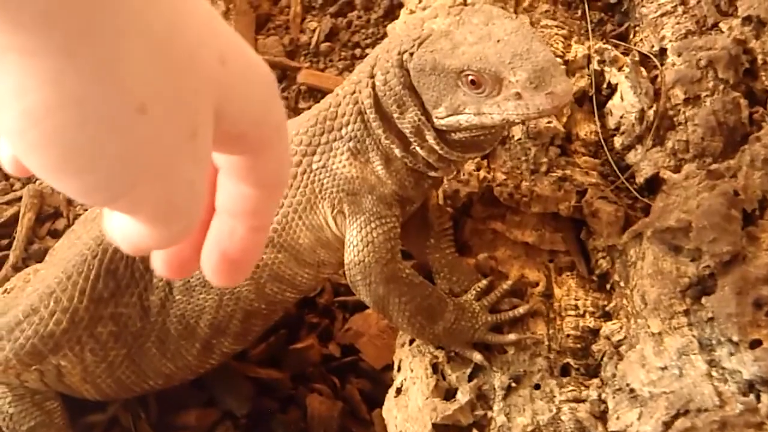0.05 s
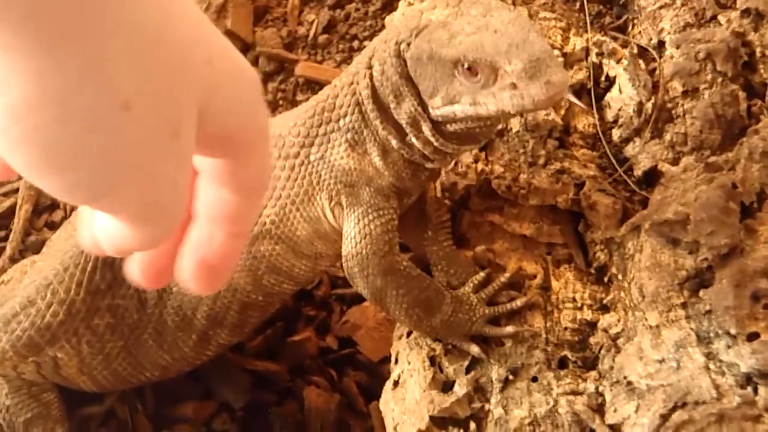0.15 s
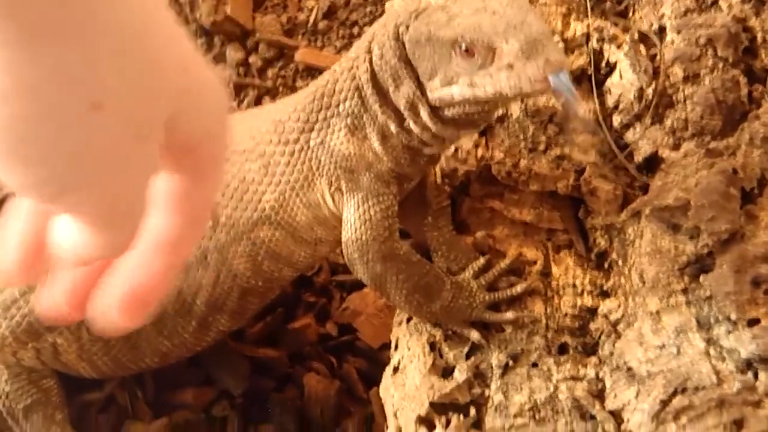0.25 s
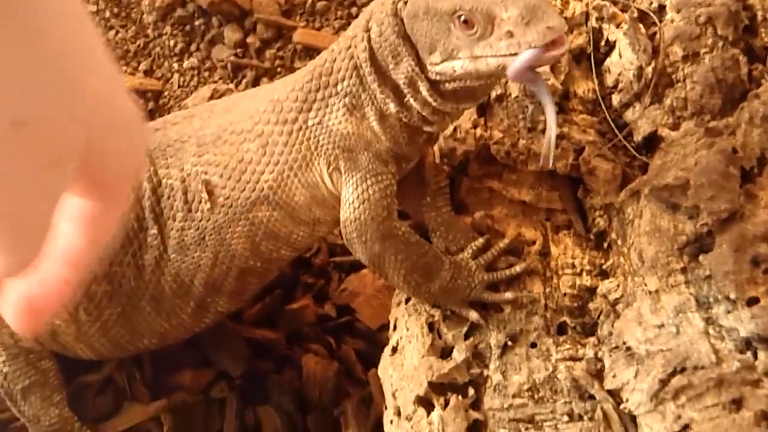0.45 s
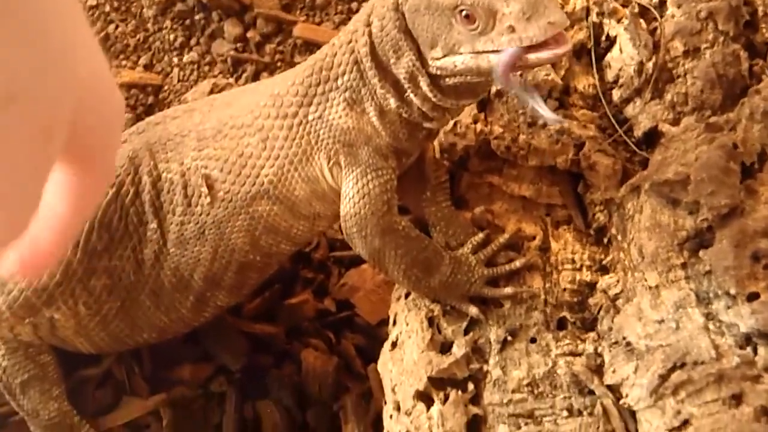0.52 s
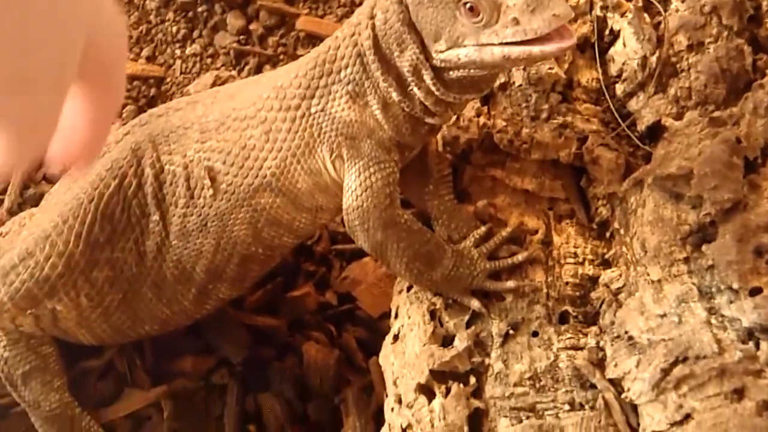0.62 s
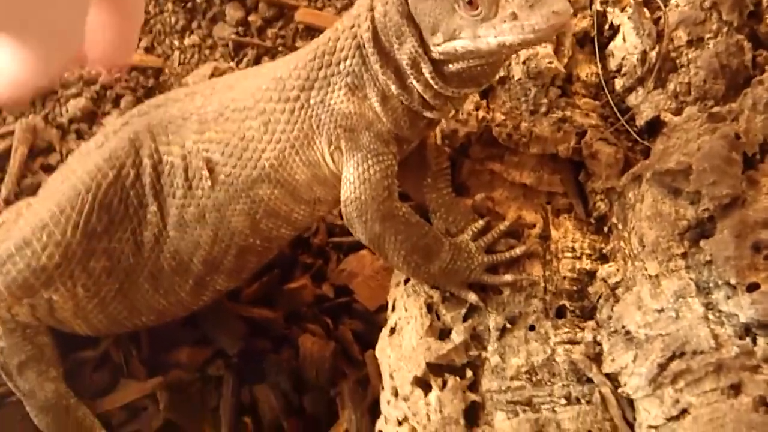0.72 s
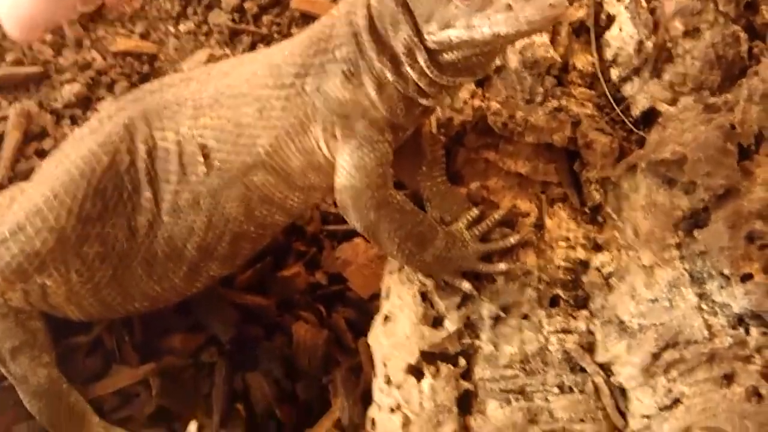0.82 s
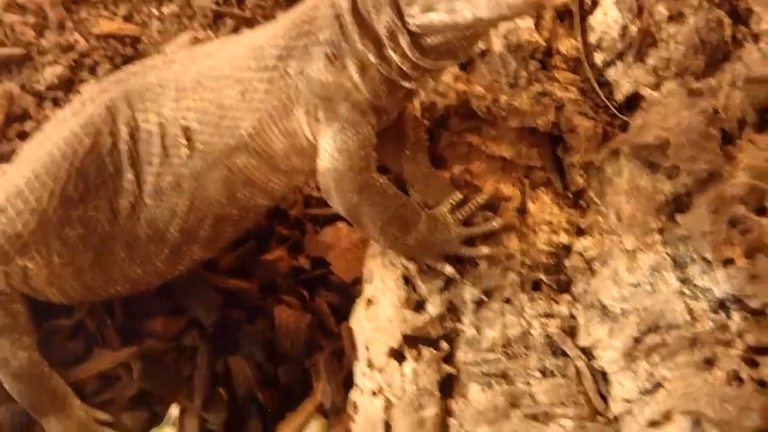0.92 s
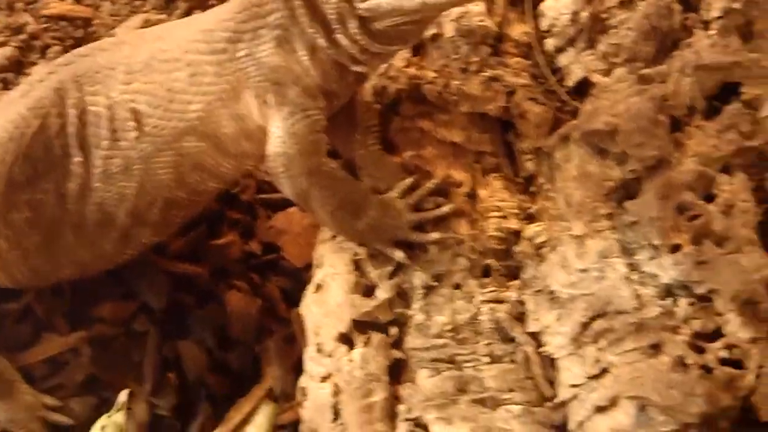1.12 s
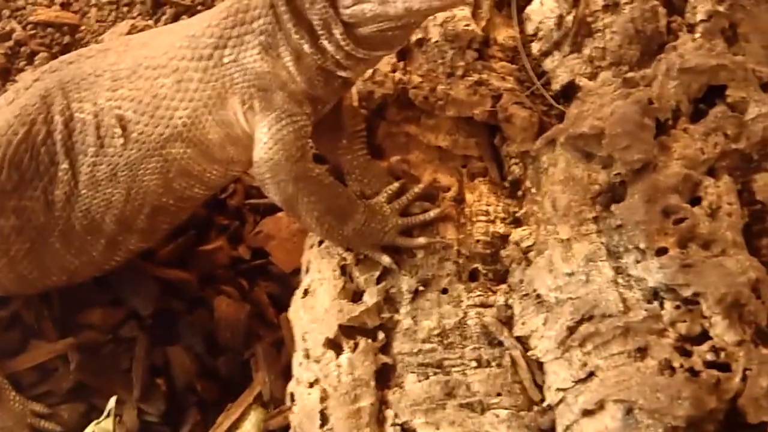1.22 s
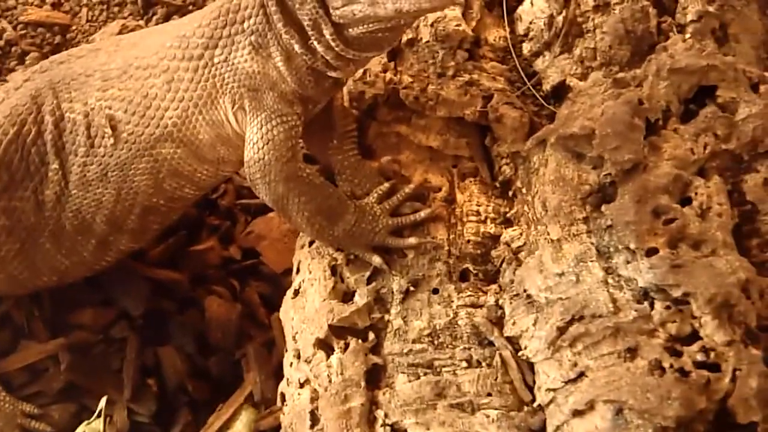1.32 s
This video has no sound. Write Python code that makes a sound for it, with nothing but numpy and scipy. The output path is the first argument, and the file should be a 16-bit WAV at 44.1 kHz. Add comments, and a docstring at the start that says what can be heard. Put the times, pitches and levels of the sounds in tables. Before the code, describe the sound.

A cricket chirps twice indoors, with soft low bumps and faint room hiss.

```python
"""A cricket chirps twice across a hard-walled room, two wing strokes to a chirp, and the room rings on.
In each stroke a scraper runs along the wing's file, making a high tone that falls as the wing slows.
Close by, a hand-held camera takes soft bumps and rubs, and dry ticks sound from the bark and litter
of a terrarium. Behind it all are a steady room hiss and a faint wash of more distant crickets."""
import sys
import numpy as np
from scipy import signal
from scipy.fft import rfft, irfft
from scipy.io import wavfile

SR = 44100
rng = np.random.default_rng(int(sys.argv[2]) if len(sys.argv) > 2 else 0)


def pcm_store(signal):
    """Save signal as 16-bit PCM."""
    levels = np.round(np.clip(np.atleast_2d(signal), -1, 1) * 32767)
    wavfile.write(sys.argv[1], SR, levels.astype(np.int16).T)


N = 59535


def amp(db):
    """Decibels to gain."""
    return 10 ** (np.asarray(db) / 20)


def unit_rms(x):
    """Scales to rms 1."""
    return x / np.sqrt(np.mean(x ** 2) + 1e-20)


def add(mix, start_s, sound):
    """Mixes a sound in at start_s."""
    part = mix[max(round(start_s * SR), 0):][:len(sound)]
    part += sound[:len(part)]


def coloured(x, spectrum):
    """Filters by (f/Hz, level/dB) points, interpolated over log frequency."""
    hz, db = np.transpose(spectrum)
    bin_hz = np.fft.rfftfreq(N, 1 / SR)
    gain = amp(np.interp(np.log(bin_hz + 1), np.log(hz), db))
    return irfft(rfft(x) * gain, N)


def band_noise(centre_hz, width_hz):
    """Noise in a bell-shaped band, rms 1."""
    bell = np.exp(-2 * ((np.fft.rfftfreq(N, 1 / SR) - centre_hz) / width_hz) ** 2)
    return unit_rms(irfft(rfft(rng.standard_normal(N)) * bell, N))


def room(x, t60_s, build_s):
    """Dense reflections of random sign that build up and die away, at the rms of x."""
    t = np.arange(SR) / SR
    taps = rng.choice([-1., 1.], SR) * (rng.random(SR) < 0.1)
    taps *= (1 - np.exp(-(t / build_s) ** 2)) * amp(-60 * t / t60_s)
    return unit_rms(signal.fftconvolve(x, taps)[:N]) * np.sqrt(np.mean(x ** 2))


# Room noise spectrum: f/Hz, level/dB
HISS_SPECTRUM = [(15, -25), (25, 0.5), (231, -2.5), (301, -3), (382, 0), (649, -3), (802, -2), (916, -4),
                 (2080, -7.5), (2860, -9), (4850, -9), (5840, -11.5), (14000, -14)]


def room_hiss(level_db=-54):
    """Steady hiss and rumble of the room."""
    return amp(level_db) * unit_rms(coloured(rng.standard_normal(N), HISS_SPECTRUM))


def far_crickets(level_db=-64.5):
    """Distant chirps blur into a thin steady band."""
    return amp(level_db) * band_noise(centre_hz=4734, width_hz=610)


# Hand rubs: centre t/s, half length/s, level/dB
HAND_RUBS = [(0.282, 0.095, -57), (0.666, 0.027, -58.5), (1.221, 0.069, -62)]


def hand_rubs():
    """Dull friction of a moving hand swells and fades around the bumps."""
    t = np.arange(N) / SR
    envelope = sum(amp(db) * np.exp(-((t - centre_s) / half_s) ** 2) for centre_s, half_s, db in HAND_RUBS)
    return envelope * band_noise(centre_hz=253, width_hz=780)


# Camera bumps: centre t/s, level/dB, f/Hz
CAMERA_BUMPS = [(0.039, -46, 130), (0.2464, -41, 170), (0.282, -63, 204), (.295, -31, 216),
                (0.357, -48, 149), (0.5516, -29.5, 308), (0.5564, -37.5, 410), (.5825, -39.5, 153),
                (0.677, -48.5, 265), (0.684, -41.5, 200), (1.232, -48, 95), (1.328, -57.5, 89.5)]


def camera_bumps(half_s=0.03, width_cycles=0.37, lead_cycles=0.059):
    """Each bump is one heavily damped low swing of the camera body."""
    out = np.zeros(N)
    t = np.arange(-half_s, half_s, 1 / SR)
    for centre_s, db, hz in CAMERA_BUMPS:
        cycles = t * hz
        swing = -np.cos(2 * np.pi * (cycles + lead_cycles))
        envelope = amp(db) / np.cosh(cycles / width_cycles * np.pi / 2)
        add(out, centre_s - half_s, envelope * swing)
    return out


# Bark and litter ticks: t/s, level/dB, decay/s
LITTER_TICKS = [(1.0625, -40.5, 0.01), (1.085, -53, 0.0095), (1.181, -39, 0.0087)]
# Tick spectrum: f/Hz, level/dB
TICK_SPECTRUM = [(100, -25), (500, -1.5), (1500, 0), (2600, -4.5), (3600, -0.5), (4400, 8.5), (5500, -3),
                 (6600, -4), (8200, -2), (10500, -14.5), (14000, -20.5)]


def litter_ticks(rise_s=0.0004, room_db=-10.5):
    """Bark and litter give short dry bursts of noise, with a little room."""
    envelope = np.zeros(N)
    t = np.arange(SR // 8) / SR
    for start_s, db, decay_s in LITTER_TICKS:
        add(envelope, start_s, amp(db) * (1 - np.exp(-t / rise_s)) * np.exp(-t / decay_s))
    direct = envelope * unit_rms(coloured(rng.standard_normal(N), TICK_SPECTRUM))
    return direct + amp(room_db) * room(direct, t60_s=0.44, build_s=0.008)


def wing_stroke(length_s, db, first_hz, last_hz, rasp_db):
    """The scraper runs along the file: a swelling, raspy tone that falls as the closing wing slows."""
    jitter_hz, jitter_s = 55.5, 0.00091  # uneven file teeth
    attack_s, release_s = 0.0018, 0.0054
    catch_gain, crest_fraction = 0.29, 0.57
    t = np.arange(0, length_s, 1 / SR)
    progress = t / length_s
    hz = last_hz + (first_hz - last_hz) * (1 - progress) ** 1.103
    hz += jitter_hz * band_noise(0, 1 / jitter_s)[:len(t)]
    tone = np.sqrt(2) * np.sin(2 * np.pi * np.cumsum(hz) / SR)
    rasp = amp(rasp_db) * band_noise(hz.mean(), width_hz=750)[:len(t)]
    swell = catch_gain + (1 - catch_gain) * np.minimum(progress / crest_fraction, 1) ** 1.48
    gate = np.minimum(t / attack_s, 1) * np.minimum((length_s - t) / release_s, 1)
    return amp(db) * swell * gate * (tone + rasp)


# Wing strokes: t/s, length/s, level/dB, first f/Hz, last f/Hz, rasp/dB, room ring offset/dB
WING_STROKES = [(.226, .034, -26, 5150, 4675, -22, -1), (0.274, .033, -24.5, 5150, 4682, -10, -2),
                (0.91, 0.0279, -28.5, 4920, 4708, -5, 1.5), (.959, 0.03, -27.5, 5030, 4686, -8, 1)]
# Wing resonance: f/Hz, gain/dB
WING_RESONANCE = [(3800, -37), (4400, -15), (4630, 1.5), (4820, -4), (5020, 0), (5250, -9), (5700, -8),
                  (7000, -27)]


def cricket(direct_db=-3.5, early_db=-9.5, ring_db=-1.5):
    """Strokes, shaped by the wing's resonance, arrive directly, off near walls and as the room's ring."""
    out = np.zeros(N)
    for start_s, *stroke, ring_offset_db in WING_STROKES:
        direct = np.zeros(N)
        add(direct, start_s, wing_stroke(*stroke))
        early = room(direct, t60_s=0.1, build_s=0.0042)
        ring = room(direct, t60_s=0.47, build_s=0.016)
        out += amp(direct_db) * direct + amp(early_db) * early + amp(ring_db + ring_offset_db) * ring
    return coloured(out, WING_RESONANCE)


def scene():
    """All sources at one microphone."""
    return (cricket() + far_crickets() + camera_bumps() + hand_rubs() + litter_ticks() + room_hiss())[None]


def record(dry):
    """The recorder's band limit."""
    cutoff_hz = 14350
    lowpass = signal.firwin(511, cutoff_hz, window=("kaiser", 9), fs=SR)
    return signal.oaconvolve(dry, lowpass[None], "same")


dry = scene()
out = record(dry)
pcm_store(out)
```